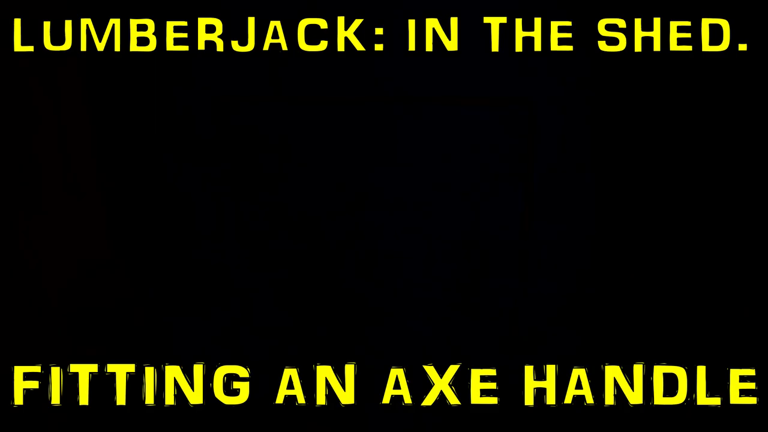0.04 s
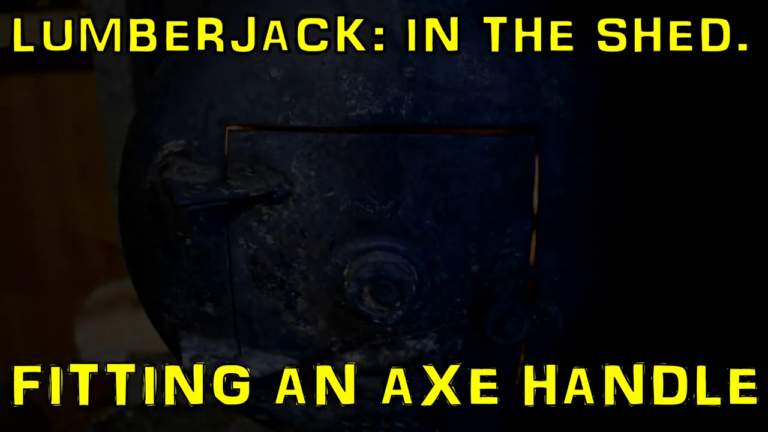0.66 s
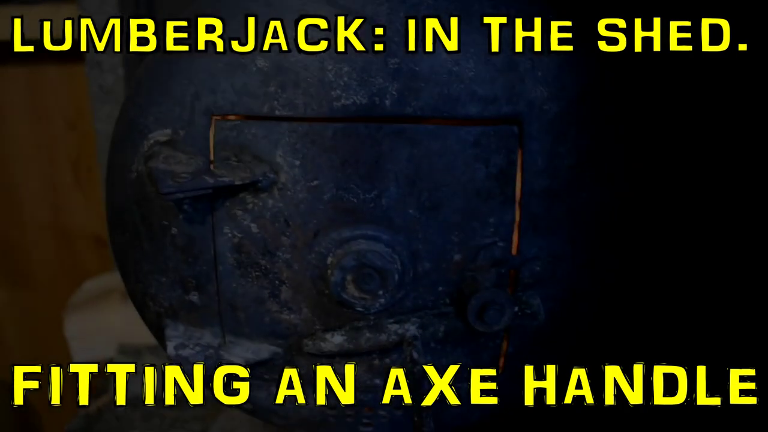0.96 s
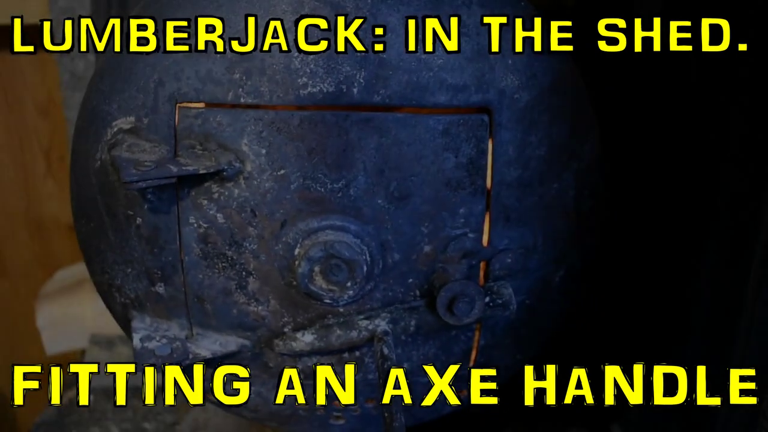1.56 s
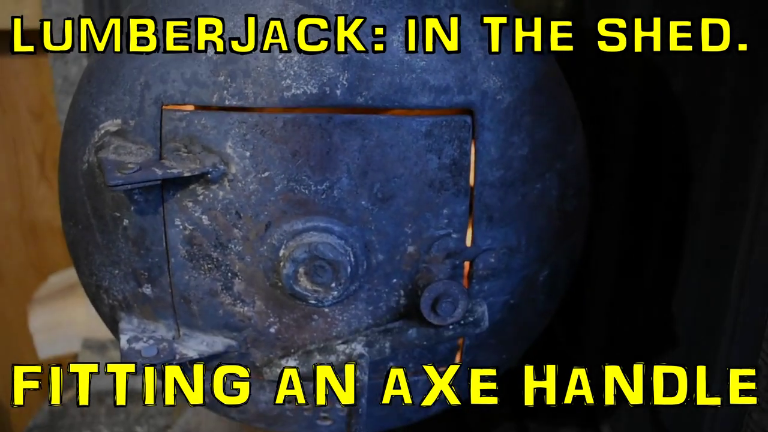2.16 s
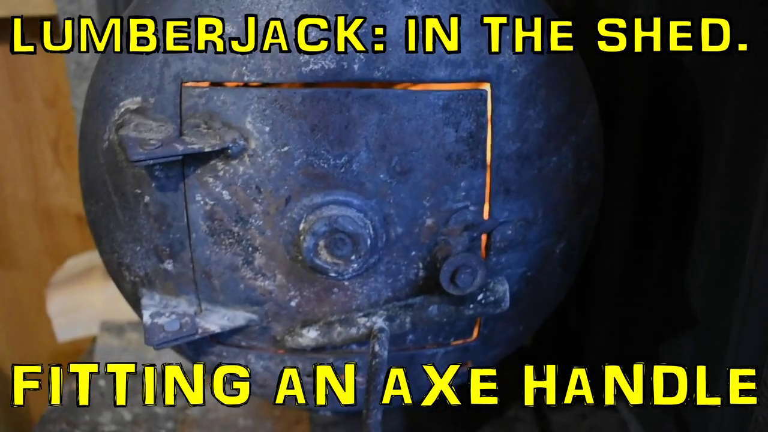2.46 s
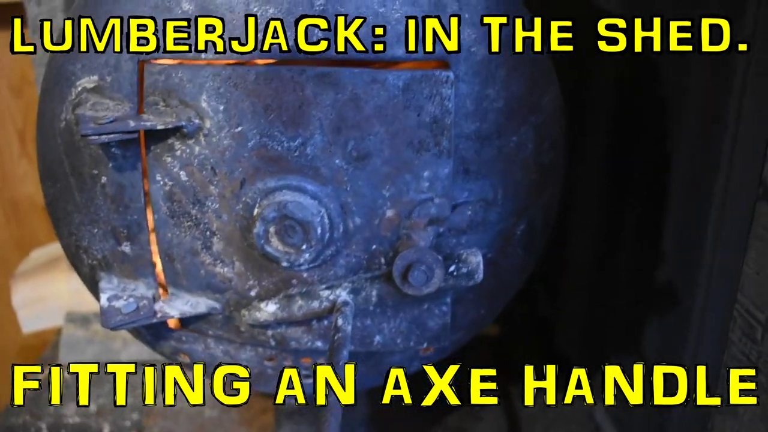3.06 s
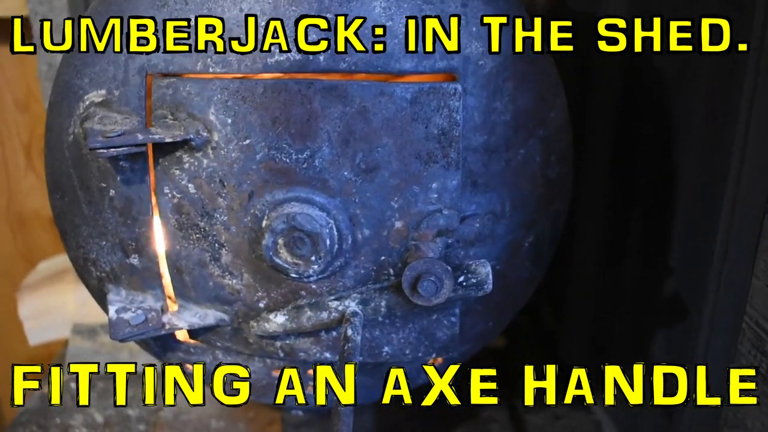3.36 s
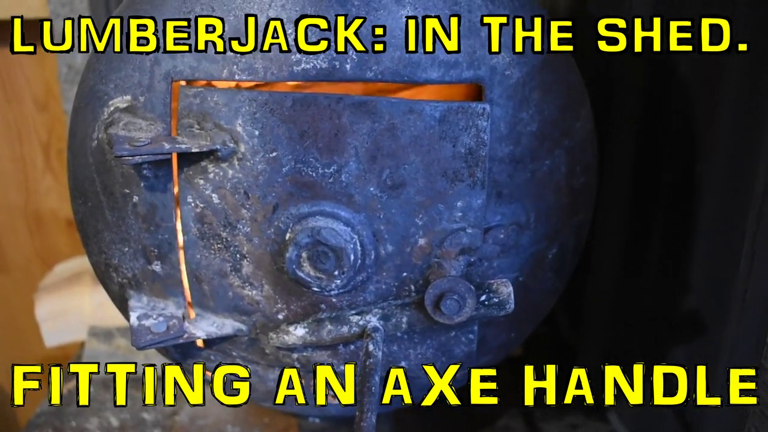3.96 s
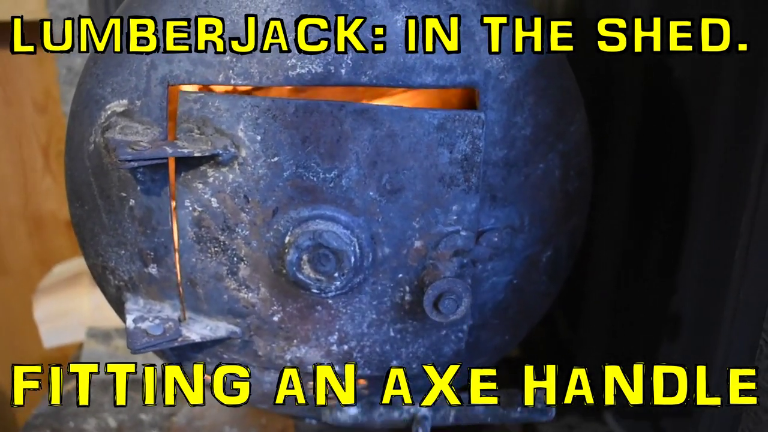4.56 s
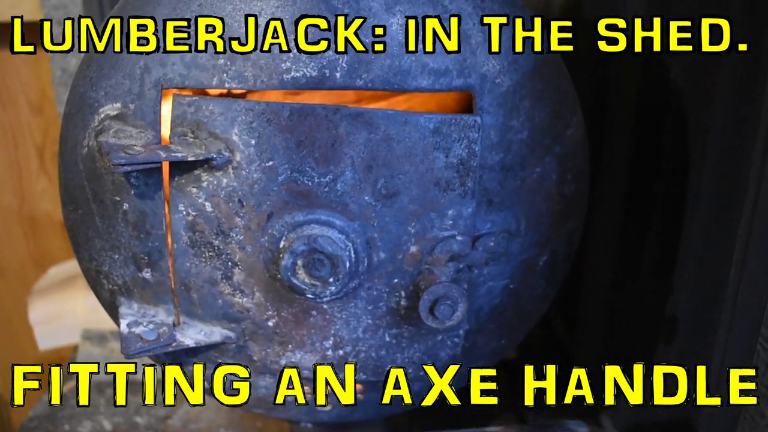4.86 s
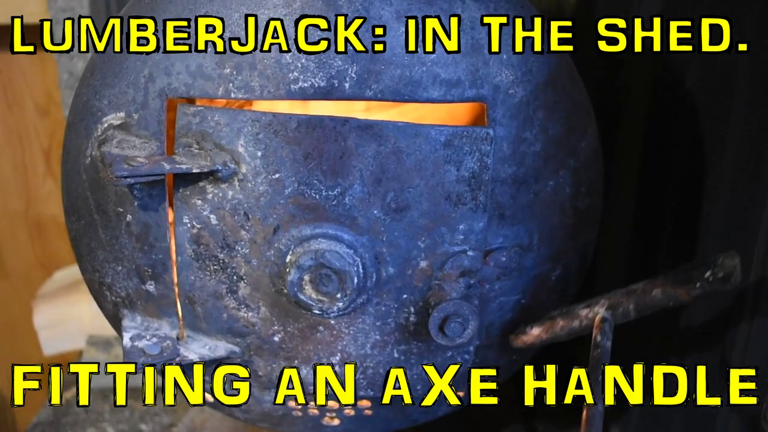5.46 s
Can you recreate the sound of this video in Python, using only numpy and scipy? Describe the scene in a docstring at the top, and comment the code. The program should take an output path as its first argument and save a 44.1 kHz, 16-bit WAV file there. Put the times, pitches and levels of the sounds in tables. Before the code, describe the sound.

A metal stove door is unlatched and clanks ajar with ringing scrapes and squeaks, while a wood fire hisses and crackles quietly.

```python
"""A cast-iron wood stove in a small shed, heard from close by, fading in over three seconds.
At first a wood fire rumbles, hisses and pops softly while fingers tap and scrape the latch.
At 2.1 s the latch is knocked free, then dragged over its catch; every touch makes the iron ring.
At 2.9 s the door clanks ajar, air rushes in and the fire flares. The dry hinge sticks and slips, squeaking.
At 4.3 s the door clanks again, and the fire burns on, its flames louder than before, its sap popping."""
import sys
import numpy as np
from scipy import signal
from scipy.fft import rfft, irfft, next_fast_len
from scipy.io import wavfile
from scipy.ndimage import map_coordinates

SR = 44100
rng = np.random.default_rng(int(sys.argv[2]) if len(sys.argv) > 2 else 0)


def unload_audio(sound):
    """Save the sound as a 16-bit wav file, at the path given as the first command line argument."""
    columns = np.transpose(np.atleast_2d(sound))
    # keep every value between -1 and 1, then stretch to whole-number steps
    steps = np.round(np.clip(columns, -1, 1) * 32767)
    wavfile.write(sys.argv[1], SR, steps.astype(np.int16))


N = 247842
TIME = np.arange(N) / SR
RING_TIME = np.arange(2 ** 15) / SR   # the clock for one ringing sound, in seconds
BAND_EDGES_HZ = 44 * 2 ** np.arange(0, 9, .5)
TONE_HZ = (330, 1200, 4200, 12500)   # the bass, middle, edge and top of a blow's tone

# The low rumble of the flames, from bass to treble: frequency_hz, level_db
FLAME_SPECTRUM = [(25, -34), (60, -18), (100, -10), (160, 2.5), (230, -1), (330, -2), (450, -18),
                  (800, -27.5), (2000, -41.5)]
# The hiss of gas leaving the wood: frequency_hz, level_db
HISS_SPECTRUM = [(40, -29), (100, -12), (300, -15), (620, 7.5), (900, 1.5), (1280, 5.5), (1800, 0.5),
                 (2500, -1.5), (3500, -5.5), (6000, -13), (10000, -17.5), (16000, -26)]
# The wood pops and settles: start_s, level_db, centre_hz
WOOD_POPS = [(0.278, -40, 10700), (0.3904, -38.5, 3540), (1.004, -34.5, 110), (3.368, -56, 8000),
             (3.732, -44.5, 11300), (3.757, -45, 3870), (3.831, -43, 13400), (4.691, -41.5, 1690),
             (4.811, -44, 1790), (4.874, -50.5, 11050), (4.95, -45, 1560), (5.171, -41.5, 2400),
             (5.268, -51, 9900), (5.397, -44, 2460), (5.513, -44, 11000), (5.606, -43, 4100)]
# Tones of the iron: the door ringing on after the knock at 1.68 s (the first two rows), then dry squeaks at the
# latch and hinge: start_s, length_s, pitch_hz, level_db
IRON_TONES = [(1.679, 0.22, 722, -48), (1.687, 0.15, 914, -51), (2.574, 0.044, 3040, -28),
              (2.575, 0.039, 5900, -28), (2.66, 0.093, 896, -33), (2.906, 0.037, 4890, -19),
              (3.017, 0.11, 2237, -36.5), (3.09, 0.053, 912, -32), (3.83, 0.058, 1165, -26.5),
              (3.858, 0.043, 1142, -31), (3.896, 0.023, 1767, -31.5), (4.364, 0.14, 5060, -30),
              (4.417, 0.055, 4860, -30)]
# The notes of the door and stove body (ring_s is the time to fall 60 dB): pitch_hz, level_db, ring_s
DOOR_NOTES = [(278, -7, .5), (363, -6, .5), (498, -7, .5), (582, -6, .4), (614, -5, .45), (650, -9, .35),
              (722, -11, .45), (872, -10, .35), (915, -11, .4), (985, -8, .26), (1045, -7, .22),
              (1137, -11, .25), (1222, -5, .3), (1297, -12, .28), (1507, -8, .18), (1545, -10, .22),
              (1770, -10, .26), (1809, -6, .28), (1832, -8, .24), (2283, -12, .28), (2379, -8, .26),
              (2433, -7, .2), (2585, -7, .24), (2925, -4, .18), (3010, -8, .2), (3121, -2, .2),
              (3644, -7, .19), (3831, -6, .19), (4063, -9, .17), (4937, -7, .18)]
# The notes of the latch bar: pitch_hz, level_db, ring_s
LATCH_NOTES = [(3058, -12, .14), (3700, -10, .13), (5437, -9, .14), (5900, -9, .14), (6015, -8, .14),
               (7250, -13, .11), (7930, -14, .2), (8389, -9, .12), (9173, -9, .12), (10013, -13, .15),
               (10890, -14, .14), (14229, -12, .17), (14520, -9, .15)]
# The "wash", a crowd of weaker notes blurred by the shed: frequency_hz, octave_level_db, ring_s
WASH_SPECTRUM = [(60, -35, 0.18), (120, -27.5, .5), (250, -5, 0.88), (483, -1.5, 0.58), (1045, -2.5, 0.34),
                 (2000, -2, 0.3), (3700, -3, 0.28), (8000, -5.5, 0.15), (16000, -9.5, 0.19)]
# The latch taps its catch: start_s, level_db, edge_db, top_db, latch_db
LATCH_TAPS = [(0.524, -34.5, -5, -25, -23), (0.626, -41, -24, -24, -6), (0.793, -49, 7, -2.5, -11),
              (1.121, -47, -16, -13, -15), (1.195, -45, 7.5, -2, -5), (2.5231, -41, 12, -0.5, -5),
              (2.577, -39.5, 8, -26, 2.5), (2.609, -27.5, -8.5, -39.5, 2), (2.665, -26.5, 0, -23, -5),
              (2.736, -30, 4.5, -8, -31), (2.8136, -32, -1, 4.5, -29), (3.895, -39.5, -10.5, -26, -2)]
# The latch is dragged over its catch, and in the last row the door bounces a second time after the clank at 4.3
# s: start_s, level_db, edge_db, chatter_s
LATCH_SCRAPES = [(0.514, -51.5, -0.5, .005), (0.811, -41, -16, 0.0077), (1.046, -54, -4, 0.011),
                 (1.358, -49.5, -3.5, 0.017), (1.484, -43, -13.5, 0.0081), (1.642, -38, -11, 0.0073),
                 (1.680, -35, -12, 0.007), (2.312, -32.5, -0.5, .016), (2.516, -38, -13, .005),
                 (2.714, -26, 0, 0.014), (2.771, -29, -7, 0.0084), (3.938, -40, -25, 0.0051),
                 (4.297, -46, 6.5, 0.038), (4.486, -33.5, -9, 0.0083)]
# The latch is knocked free and the door is jolted:
# start_s, level_db, seating_s, chatter_s, edge_db, latch_db, rebound_db
HEAVY_CLANKS = [(2.081, -10.5, .001, 0.0033, 7.5, -5, -12.5), (2.885, -15.5, 0.0088, 0.0048, 0, -27, -37),
                (4.325, -17.5, 0.011, 0.0077, -2.5, -20, -7)]


def from_db(db):
    """Turn decibels into a number to multiply a sound by."""
    return 10 ** (np.asarray(db) / 20)


def rms_one(x):
    """Scale a sound so that its average strength (rms) is 1."""
    return x / np.sqrt(np.mean(x ** 2) + 1e-20)


def dying(ring_s):
    """A fade that falls 60 dB in ring_s."""
    return np.exp(-np.log(1000) * RING_TIME / max(ring_s, 1e-3))


def drift(rate_hz, t):
    """A wobble that glides to a new random value rate_hz times a second."""
    values = rng.standard_normal(2 ** 11)
    return map_coordinates(values, [t * rate_hz], order=1, mode="wrap")


def colour(x, hz, db):
    """Turn each frequency in hz up or down by its db, sloping smoothly in between."""
    size = next_fast_len(2 * len(x), True)
    size += size % 2
    grid_hz = np.maximum(np.arange(size // 2 + 1) * SR / size, 1)
    gain = from_db(np.interp(np.log(grid_hz), np.log(hz), db))
    # a minimum-phase filter: nothing rings before the sound that causes it
    cepstrum = irfft(np.log(gain))
    cepstrum[1:size // 2] *= 2
    cepstrum[size // 2 + 1:] = 0
    return irfft(rfft(x, size) * np.exp(rfft(cepstrum)))[:len(x)]


def add(track, start_s, sound):
    """Mix a sound into the track at start_s."""
    at = max(round(start_s * SR), 0)
    track[at:at + len(sound)] += sound[:max(N - at, 0)]


def noise_bands():
    """Noises half an octave wide, from low to high, as pairs of centre_hz and noise."""
    bands = []
    for low, high in zip(BAND_EDGES_HZ, BAND_EDGES_HZ[1:]):
        band_filter = signal.butter(2, [low, high], "band", fs=SR, output="sos")
        noise = signal.sosfilt(band_filter, rng.standard_normal(N))
        bands.append((np.sqrt(low * high), rms_one(noise) / np.sqrt(2)))
    return bands


def washes(bands, count):
    """Stove and shed answer a knock with a burst of noise, new each time, whose treble dies early."""
    points_hz, levels_db, rings_s = np.transpose(WASH_SPECTRUM)
    starts = rng.integers(SR // 10, N - len(RING_TIME), count)
    out = np.zeros((count, len(RING_TIME)))
    for hz, noise in bands:
        level_db = np.interp(np.log(hz), np.log(points_hz), levels_db)
        ring_s = np.interp(np.log(hz), np.log(points_hz), rings_s)
        pieces = np.array([noise[i:i + len(RING_TIME)] for i in starts])
        out += pieces * (from_db(level_db) * dying(ring_s))
    return out


def contact(chatter_s, slips_per_s=1400, even_share_s=0.005):
    """One push, then tiny slips of rough faces; past even_share_s, the slips outweigh the push."""
    age = RING_TIME[:len(RING_TIME) // 4] / max(chatter_s, 1e-4)
    sizes = rng.standard_normal(len(age))
    slipping = rng.random(len(age)) < slips_per_s / SR
    slips = sizes * slipping * age * np.exp(-age)
    force = slips / (np.linalg.norm(slips) + 1e-9) * chatter_s / even_share_s
    force[0] = 1
    return force / np.linalg.norm(force)


def draught(lasting_db, flare_db, flare_s, ajar_s=2.86, opening_s=.1):
    """Air rushes in at the door: the fire's level shifts for good, and a flare peaks after flare_s."""
    since_s = np.maximum(TIME - ajar_s, 0)
    opened = np.minimum(since_s / opening_s, 1)
    age = since_s / flare_s
    flare = (age * np.exp(1 - age)) ** 2
    return from_db(lasting_db * opened + flare_db * flare)


def flames(level_db=-52):
    """Flames in the belly of the stove make a low rumble, louder once the door is ajar."""
    rumble = rms_one(colour(rng.standard_normal(N), *np.transpose(FLAME_SPECTRUM)))
    return from_db(level_db) * draught(lasting_db=4.5, flare_db=4, flare_s=0.39) * rumble


def crackle(bands, ticks_per_s=30, spread_db=15.0, tail_db=-10, tick_s=0.0051):
    """Burning wood gives tiny bright ticks at random, most of them weak and a few strong."""
    sizes = from_db(spread_db * np.minimum(rng.exponential(1, N), 3)) * rng.choice([-1, 1], N)
    bright_wash = np.gradient(washes(bands, count=1)[0])
    tick = bright_wash * (dying(tick_s) + from_db(tail_db))
    ticking = rng.random(N) < ticks_per_s / SR
    return rms_one(signal.fftconvolve(sizes * ticking, tick)[:N])


def gas_hiss(bands, level_db=-50.5, crackle_db=-15):
    """Gas hisses and ticks out of the wood; as the door opens it flares sooner than the flames."""
    hiss = rms_one(colour(rng.standard_normal(N), *np.transpose(HISS_SPECTRUM)))
    gain = from_db(level_db) * draught(lasting_db=-0.26, flare_db=4.5, flare_s=0.15)
    return gain * (hiss + from_db(crackle_db) * crackle(bands))


def pops(bands, snap_db=9, snap_s=0.0059, far_db=-22, width_octaves=2.18):
    """Pockets of sap burst: a short, spitting snap with the hollow of the stove behind it."""
    out = np.zeros(N)
    for (start_s, level_db, centre_hz), wash in zip(WOOD_POPS, washes(bands, len(WOOD_POPS))):
        spitting_s = .006 * np.sqrt(1000 / centre_hz)   # high pops are briefer
        snap = wash * (1 + from_db(snap_db) * dying(snap_s))
        pop = signal.fftconvolve(contact(spitting_s), snap)[:len(snap)]
        octaves_away = np.log2(BAND_EDGES_HZ / centre_hz)
        tone_db = far_db * (1 - np.exp(-(octaves_away / width_octaves) ** 2))
        add(out, start_s, from_db(level_db) * colour(pop, BAND_EDGES_HZ, tone_db))
    return out


def iron_tones(bands, overtone_db=-27, shed_db=-12, judder_db=4.0, sag=0.0049):
    """Dry iron sticks and slips in a note that swells early and sags as it slows, and the door rings on after a
    knock in the same way; the shed echoes."""
    out = np.zeros(N)
    for start_s, length_s, pitch_hz, level_db in IRON_TONES:
        t = RING_TIME[RING_TIME < length_s]
        progress = t / length_s
        swell = np.sin(np.pi * progress ** (2 / 3)) * from_db(level_db + judder_db * drift(140, t))
        waver = 0.0056 * np.sqrt(pitch_hz / 1000)   # high squeaks waver more
        wavering_hz = pitch_hz * (1 + sag * (.5 - progress) + waver * drift(360, t))
        phase = 2 * np.pi * np.cumsum(wavering_hz) / SR
        add(out, start_s, swell * (np.sin(phase) + from_db(overtone_db) * np.sin(2 * phase)))
    echo = washes(bands, count=1)[0]
    return out + from_db(shed_db) * signal.fftconvolve(out, echo / np.linalg.norm(echo))[:N]


def taps(bass_db=-8.5, chatter_s=0.0037, door_db=-1.5):
    """List the latch's light, brief blows, each as bright as the spot that it hits."""
    return [(start_s, level_db, (bass_db, 0, edge_db, top_db), chatter_s, door_db, latch_db)
            for start_s, level_db, edge_db, top_db, latch_db in LATCH_TAPS]


def scrapes(bass_db=-8, top_vs_edge_db=-7.5, door_db=-2, latch_db=-2.5):
    """List the drawn-out, chattering blows of the dragged latch, which keep the iron ringing, and the door's
    second bounce at 4.49 s."""
    blows = []
    for start_s, level_db, edge_db, chatter_s in LATCH_SCRAPES:
        tone_db = (bass_db, 0, edge_db, edge_db + top_vs_edge_db)
        blows.append((start_s, level_db, tone_db, chatter_s, door_db, latch_db))
    return blows


def clanks(corner_db=-6, bass_db=-10.5, top_vs_edge_db=-10, door_db=1.5,
           rebound_s=.072, rebound_chatter_s=.006, rebound_door_db=0, rebound_latch_db=10):
    """List three blows for each heavy knock: a corner touches, the whole face lands, then it rebounds."""
    blows = []
    for start_s, level_db, seating_s, chatter_s, edge_db, latch_db, rebound_db in HEAVY_CLANKS:
        top_db = edge_db + top_vs_edge_db
        tone_db = (bass_db, 0, edge_db, top_db)
        landing_s = start_s + seating_s
        blows.append((start_s, level_db + corner_db, tone_db, chatter_s, door_db, latch_db))
        blows.append((landing_s, level_db, tone_db, chatter_s, door_db, latch_db))
        # the rebound is weaker, with a bigger share of bass and of the latch bar
        rebound_tone_db = (-3, 0, 2, top_db)
        blows.append((landing_s + rebound_s, level_db + rebound_db, rebound_tone_db,
                      rebound_chatter_s, rebound_door_db, latch_db + rebound_latch_db))
    return blows


def struck_iron(notes, count, spread_db):
    """Iron rings with many notes; each blow lands elsewhere and so gives them new strengths."""
    rings = np.array([from_db(level_db) * dying(ring_s) * np.sin(2 * np.pi * pitch_hz * RING_TIME)
                      for pitch_hz, level_db, ring_s in notes])
    shape = (count, len(notes))
    strengths = from_db(spread_db * rng.standard_normal(shape)) * rng.choice([-1, 1], shape)
    return strengths @ rings


def door_and_latch(bands, latch_boost_db=11.0, crack_db=4.0, crack_s=0.098, tick_db=6.5, tick_s=0.0079,
                   hard_blow_db=-7, shrill_hz=(11000, 14000), lowest_hz=115):
    """Every blow gives a bright tick and a crack, rings door and latch, and washes through the shed."""
    blows = clanks() + taps() + scrapes()
    out, count = np.zeros(N), len(blows)
    wash = washes(bands, count) * (1 + from_db(crack_db) * dying(crack_s))
    tick = from_db(tick_db) * np.gradient(wash, axis=1) * dying(tick_s)
    door = struck_iron(DOOR_NOTES, count, spread_db=1.5)
    latch = from_db(latch_boost_db) * struck_iron(LATCH_NOTES, count, spread_db=2.5)
    for k, (start_s, level_db, tone_db, chatter_s, door_db, latch_db) in enumerate(blows):
        # softer blows lose up to 6 dB of the latch bar's shrillest notes
        shrill_loss_db = np.clip(.7 * (hard_blow_db - level_db), 0, 6)
        latch_ring = from_db(latch_db) * colour(latch[k], shrill_hz, [0, -shrill_loss_db])
        body = tick[k] + wash[k] + from_db(door_db) * door[k] + latch_ring
        blow = signal.fftconvolve(contact(chatter_s), body)[:len(body)]
        add(out, start_s, from_db(level_db) * colour(blow, TONE_HZ, tone_db))
    # a small door cannot send out deep bass
    return signal.sosfilt(signal.butter(3, lowest_hz, "high", fs=SR, output="sos"), out)


def scene():
    """Door, latch and hinge with the fire behind them, in one channel."""
    bands = noise_bands()
    return (door_and_latch(bands) + iron_tones(bands) + pops(bands) + flames() + gas_hiss(bands))[None]


def record(dry, fade_s=2.96, head_start_s=0.02, fade_bend=0.64, lowest_hz=20, highest_hz=15900):
    """The sound fades in, the hardest clanks overload, and the deepest bass and highest treble are cut."""
    fade = np.clip((TIME + head_start_s) / fade_s, 0, 1) ** fade_bend
    clipped = np.clip(fade * dry, -0.82, 0.75)   # peaks are flattened a little lopsidedly
    trimmed = signal.sosfilt(signal.butter(2, lowest_hz, "high", fs=SR, output="sos"), clipped)
    return signal.sosfiltfilt(signal.butter(20, highest_hz, fs=SR, output="sos"), trimmed)


dry = scene()
out = record(dry)
unload_audio(out)
```